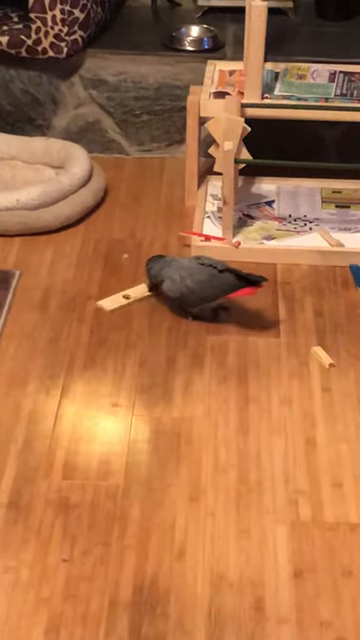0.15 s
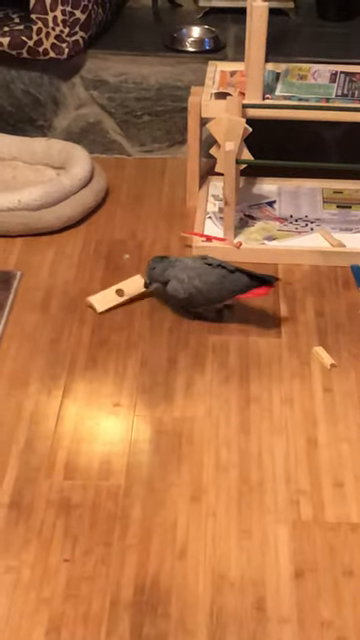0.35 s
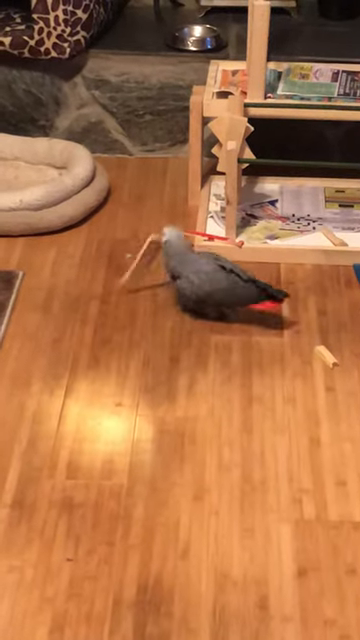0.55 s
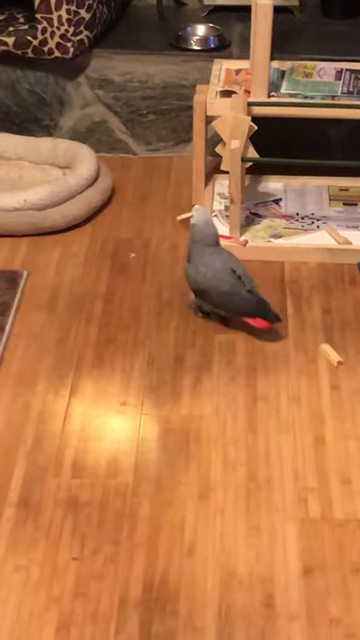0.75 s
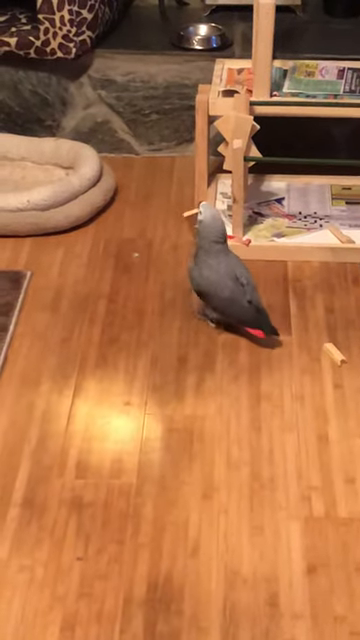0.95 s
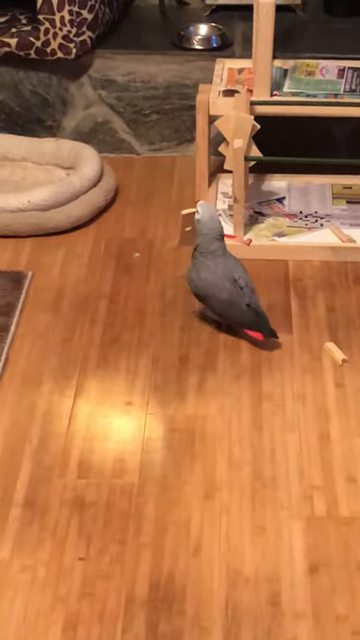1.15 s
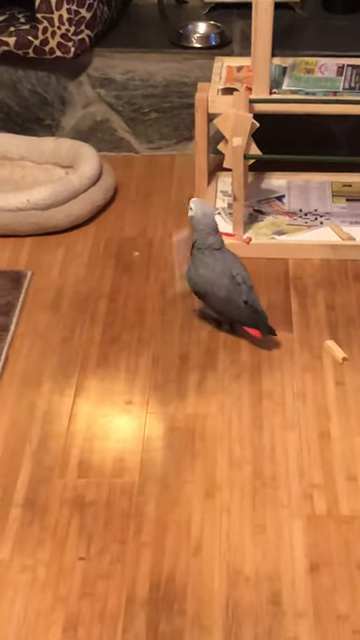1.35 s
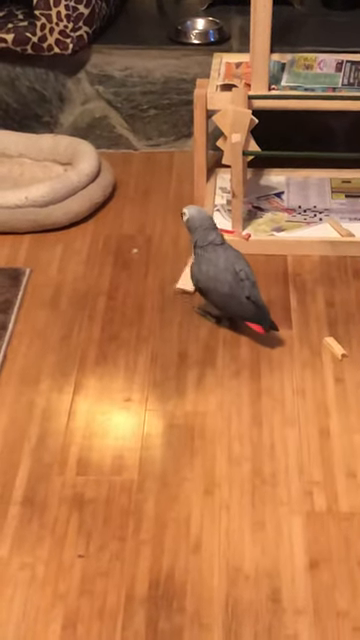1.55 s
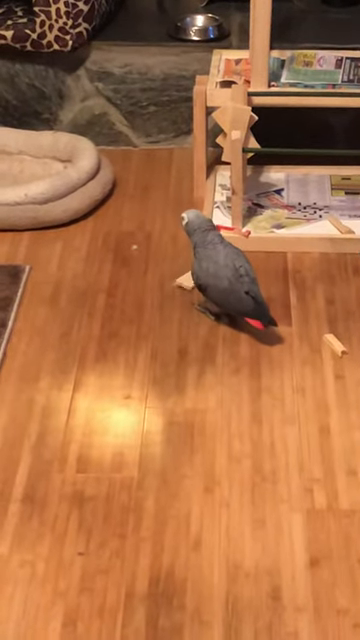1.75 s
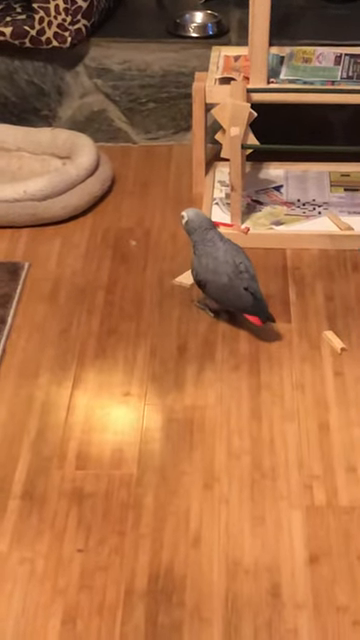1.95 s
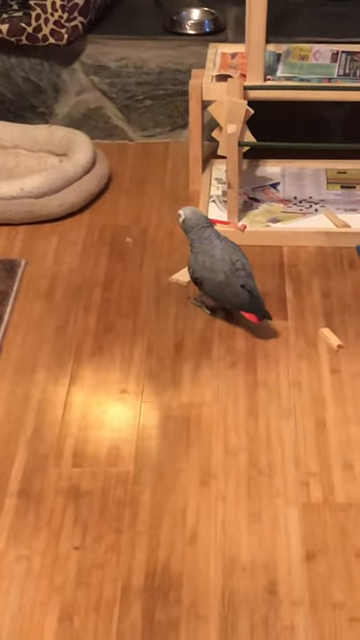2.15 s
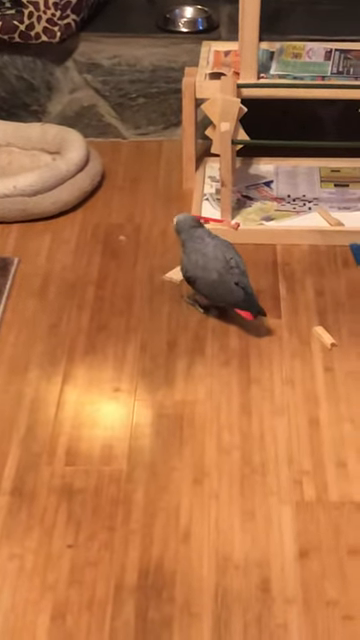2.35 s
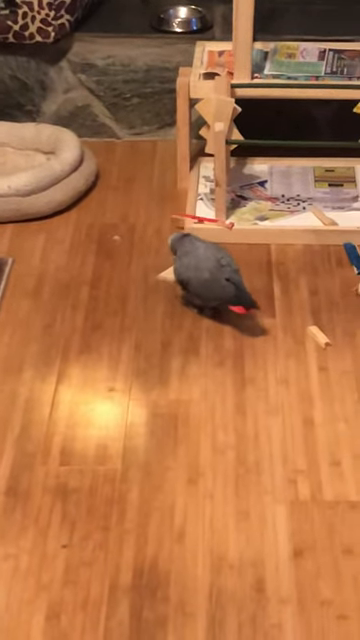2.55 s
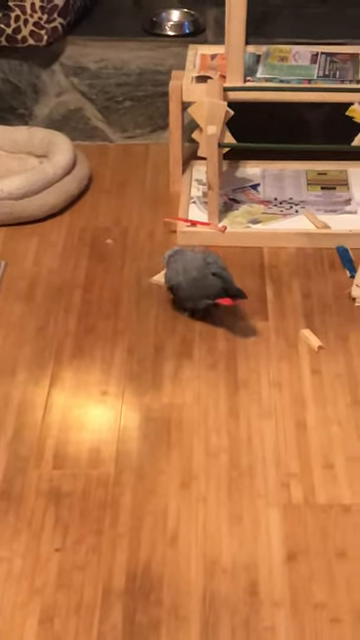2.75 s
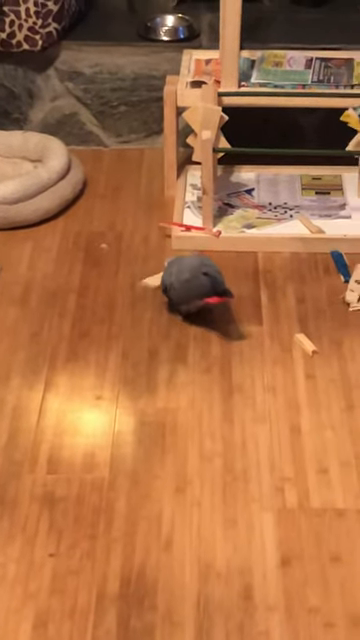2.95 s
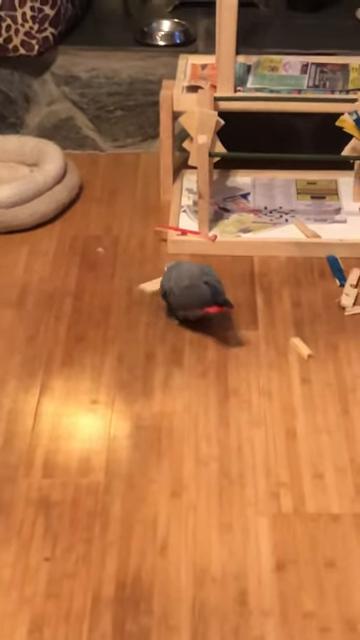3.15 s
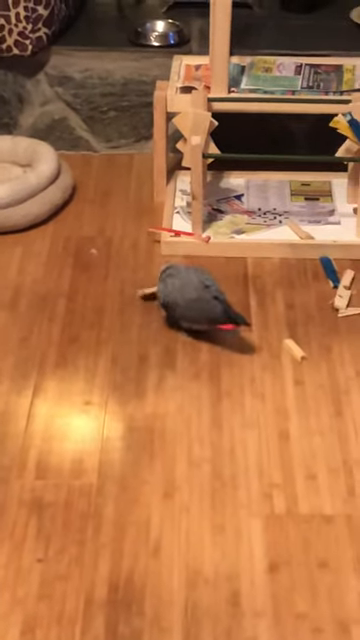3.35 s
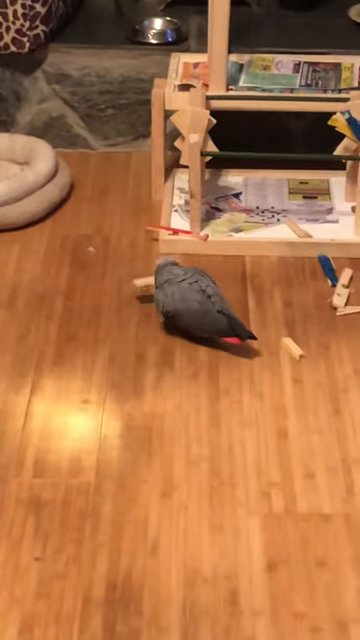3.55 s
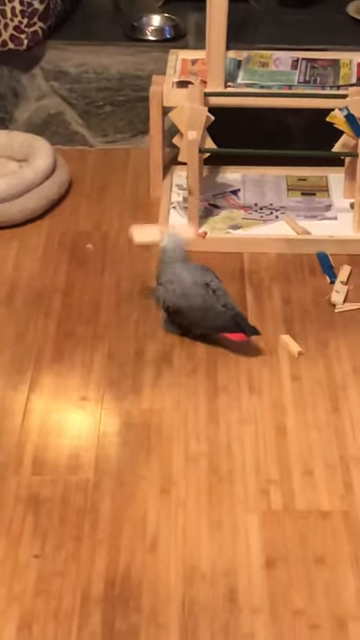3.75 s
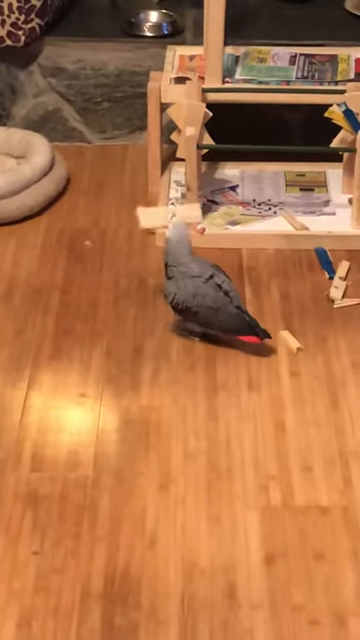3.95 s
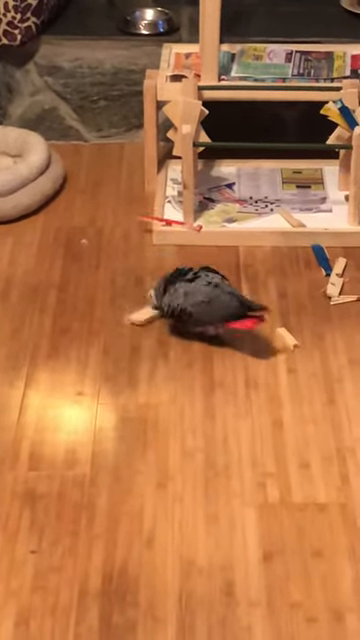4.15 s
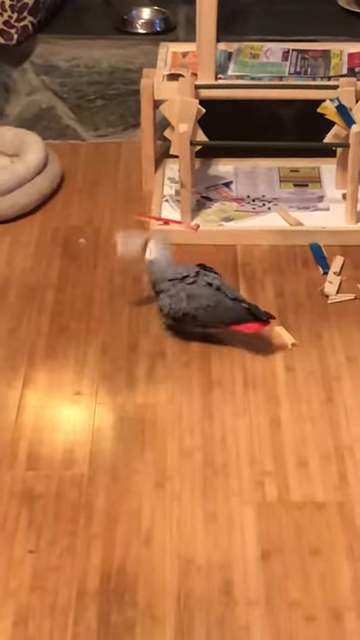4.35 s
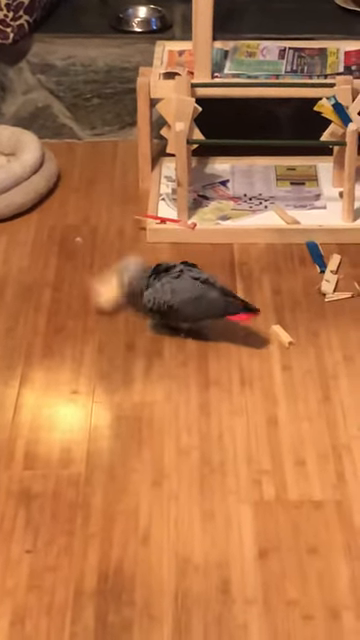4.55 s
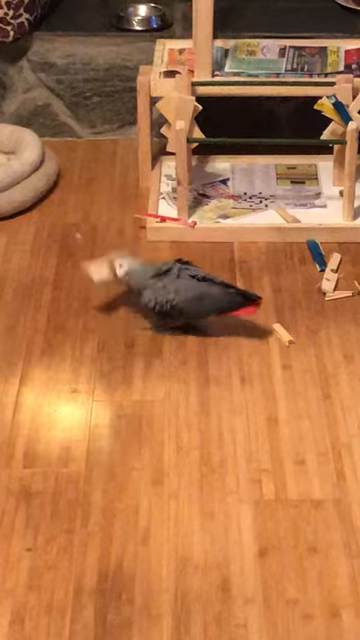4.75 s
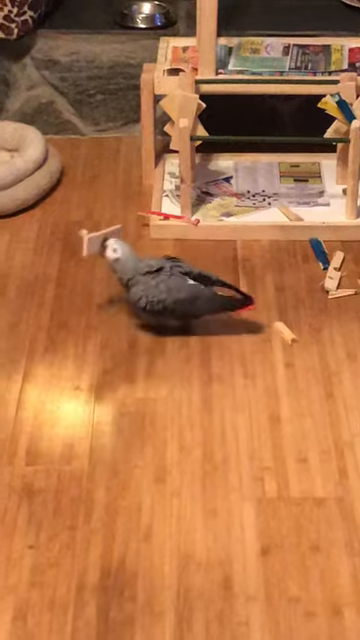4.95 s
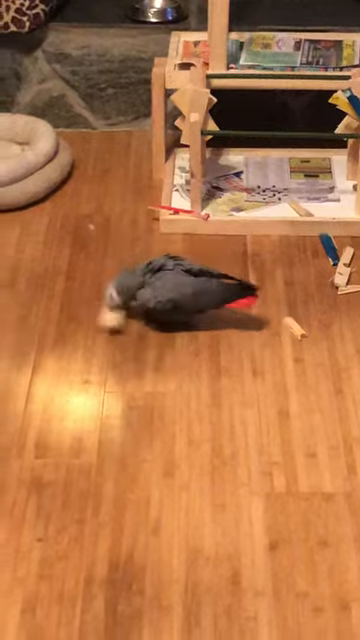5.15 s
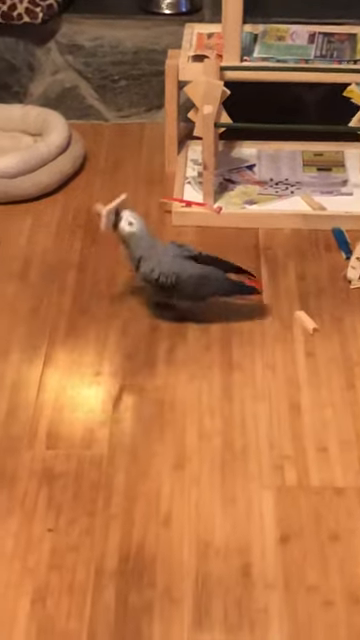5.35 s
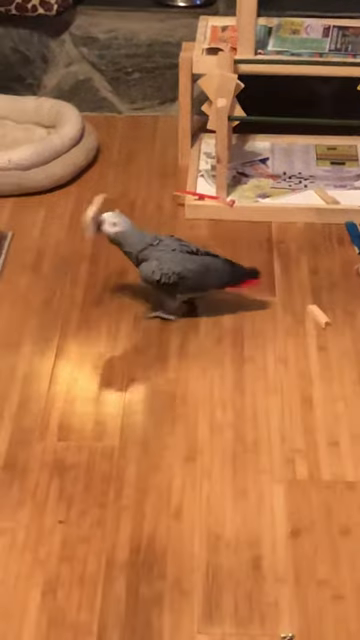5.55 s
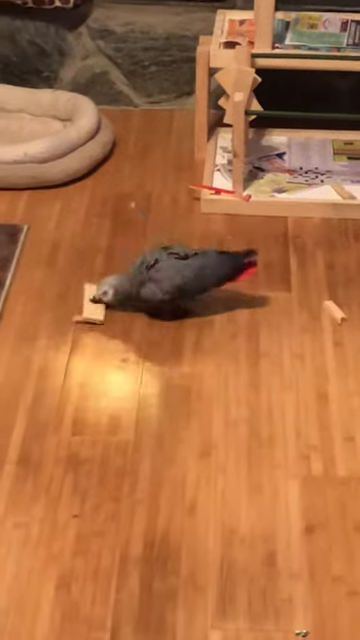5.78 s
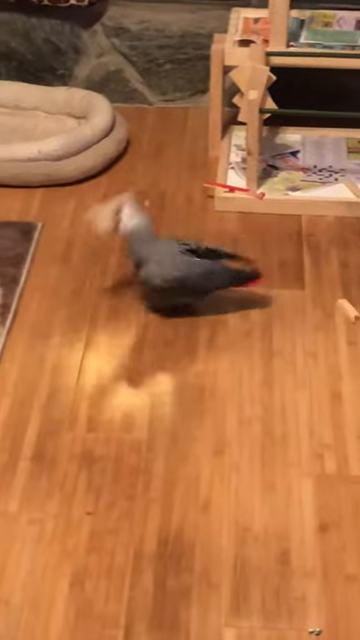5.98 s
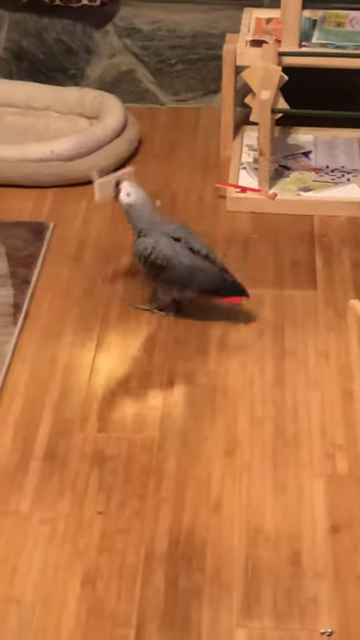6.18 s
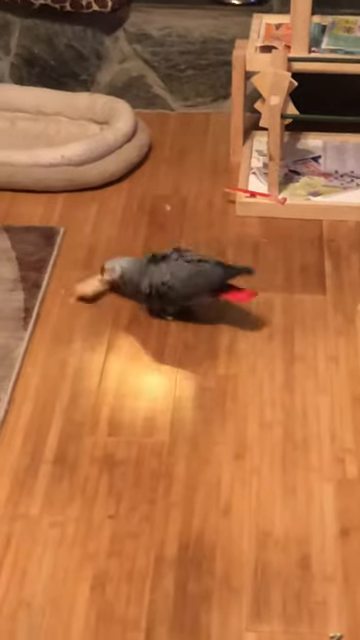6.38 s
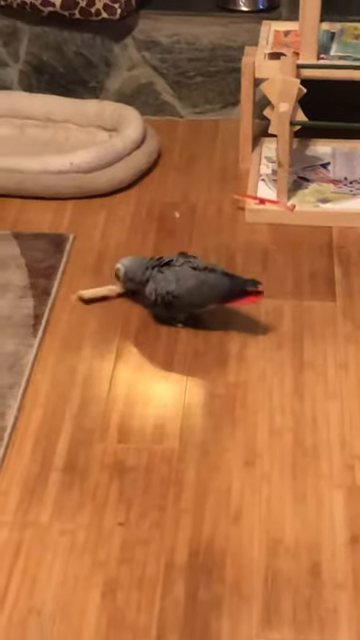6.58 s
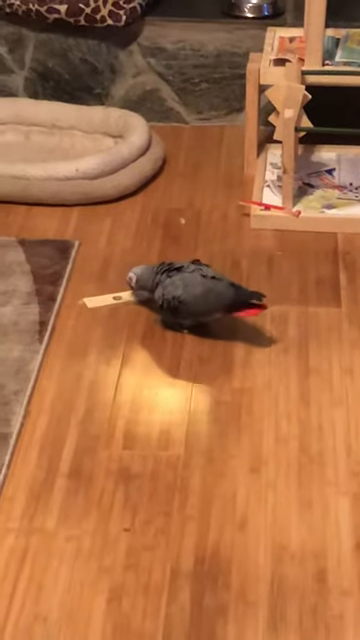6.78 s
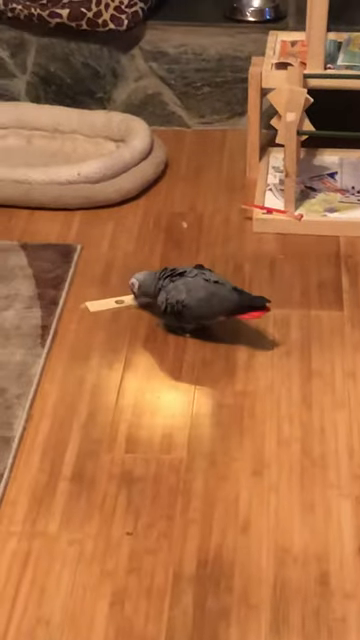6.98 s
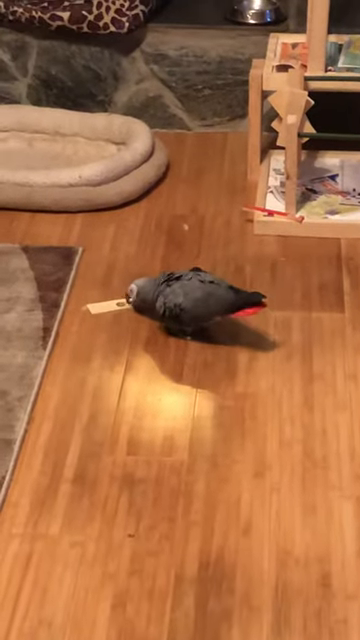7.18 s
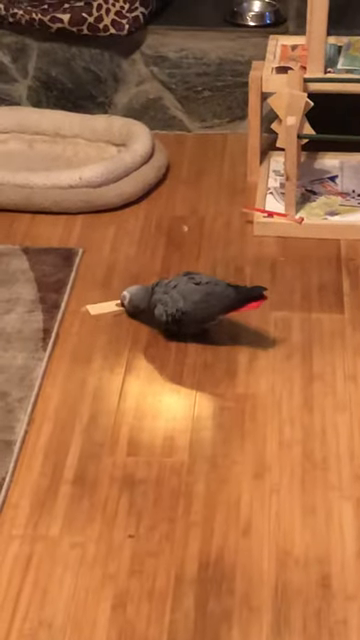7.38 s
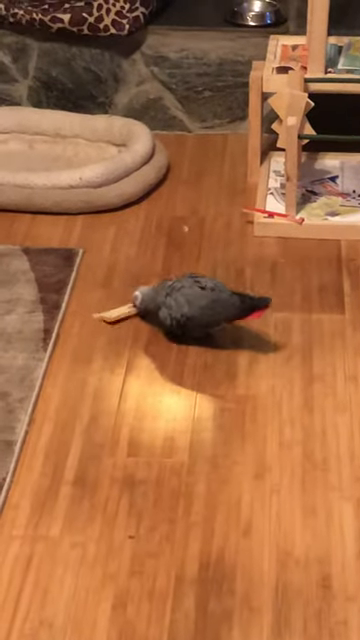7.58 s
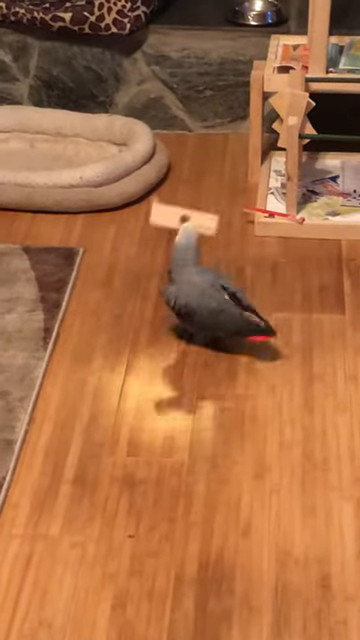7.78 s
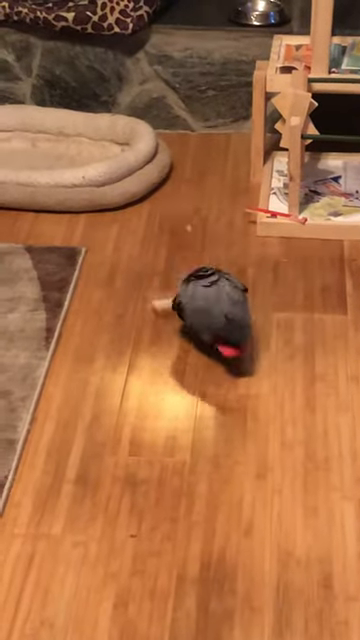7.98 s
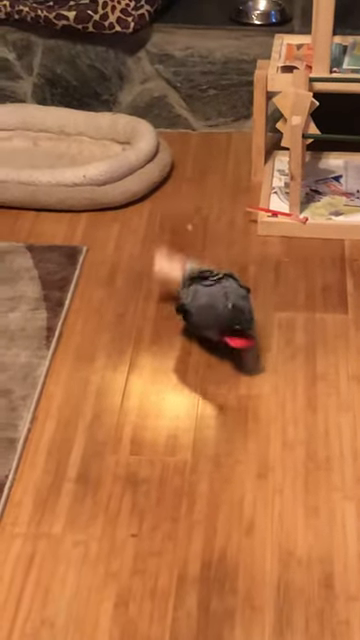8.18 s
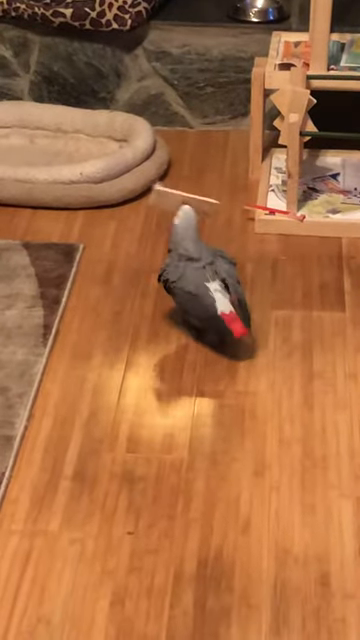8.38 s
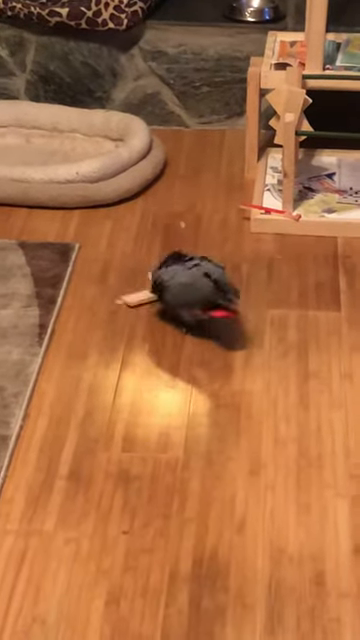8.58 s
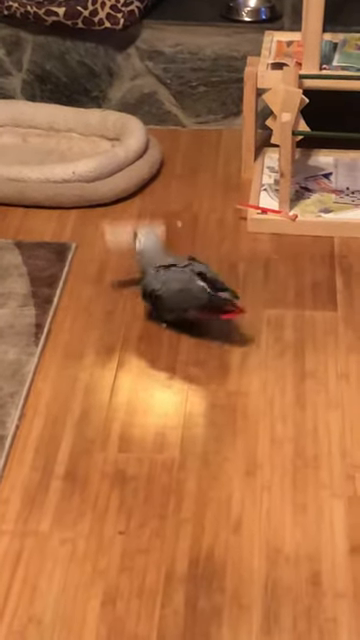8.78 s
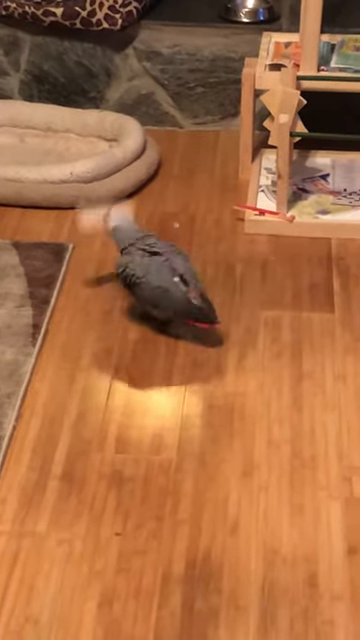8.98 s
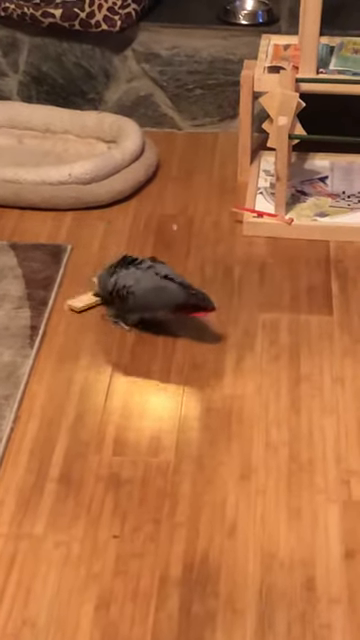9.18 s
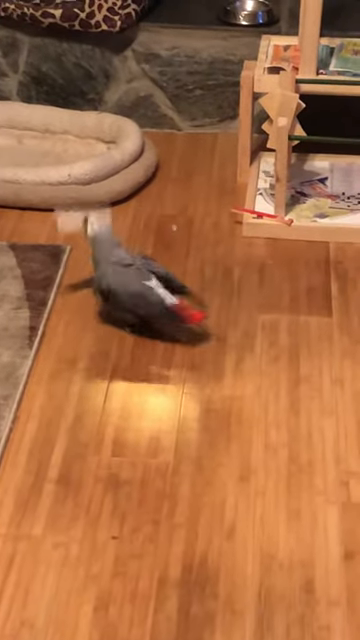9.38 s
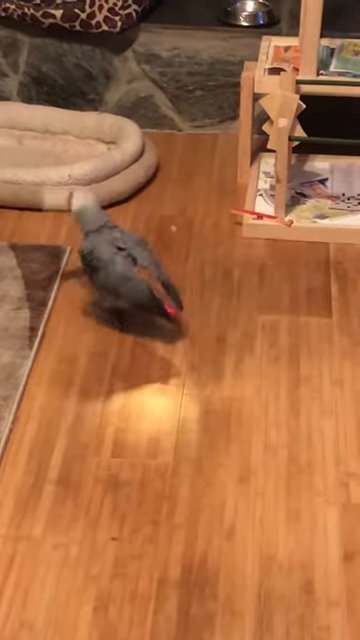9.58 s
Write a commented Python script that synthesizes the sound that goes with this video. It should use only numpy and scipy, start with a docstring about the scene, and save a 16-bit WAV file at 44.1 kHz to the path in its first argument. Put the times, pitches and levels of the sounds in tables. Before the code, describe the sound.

Irregular hard wooden knocks and quick clattering bounces on floorboards, with light claw clicks and brief rubbing, in a quiet lively living room.

```python
"""Parrot with a wooden block on a board floor

A parrot bangs a small wooden block on the floor of a living room, drops it, drags it and steps about.
Each contact sends a dispersive bending wave through the boards (a falling chirp); blows also crack and
ring the block's modes, and rubbing is a dense train of slips. Two near walls and a diffuse room answer.
A low motor hum, a wavering drone and room hiss lie underneath.
"""
import sys
import numpy as np
from scipy import signal
from scipy.fft import rfft, irfft, next_fast_len
from scipy.io import wavfile
from scipy.ndimage import uniform_filter1d, minimum_filter1d

SR = 44100
rng = np.random.default_rng(int(sys.argv[2]) if len(sys.argv) > 2 else 0)


def master(y):
    """Save y as 16-bit WAV."""
    cut = np.clip(np.atleast_2d(y).T, -1, 1)
    pcm = np.round(cut * 32767)  # scale
    wavfile.write(sys.argv[1], SR, pcm.astype(np.int16))


N = 424683
PULSE = 2048   # samples in one board wave
SIZE = next_fast_len(N + SR)   # transform length, with room for delays
HZ = np.maximum(np.arange(SIZE // 2 + 1) * SR / SIZE, 1.)


def from_db(db):
    """Logarithmic level: the amplitude gain of a level in dB."""
    return 10 ** (np.asarray(db) / 20)


def rms_one(x):
    """Normalisation: scales a signal to an rms of 1."""
    return x / np.sqrt(np.mean(x ** 2) + 1e-20)


def at_hz(points, hz, count=1):
    """Interpolation: reads a column of a spectrum table along a log-frequency axis."""
    points = np.array(points)
    return np.interp(np.log(hz), np.log(points[:, 0]), points[:, count])


def through(x, response):
    """Linear filtering: multiplies the spectrum by a frequency response."""
    return irfft(rfft(x, SIZE) * response, SIZE)[:N]


def filtered(x, order, kind, hz):
    """Linear filtering: a Butterworth filter of the given order and kind."""
    return signal.sosfilt(signal.butter(order, hz, kind, fs=SR, output="sos"), x)


def ring(x, modes):
    """Modal resonance: a unit click sets each mode ringing as a decaying sine at its level."""
    out = 0
    for hz, mode_db, t60_s in modes:
        radius = from_db(-60 / (t60_s * SR))
        angle = 2 * np.pi * hz / SR
        numerator = [0, from_db(mode_db) * np.sin(angle)]
        denominator = [1, -2 * radius * np.cos(angle), radius * radius]
        out = out + signal.lfilter(numerator, denominator, x + 1e-18)
    return out


BENDING_LAG_S = .0028   # how far 875 Hz trails 3.5 kHz


def board_wave(centre_hz, octaves):
    """Dispersion: bending waves travel with the root of frequency, so the bass trails.

    The peak is 1; 3.5 kHz arrives half-way in.
    """
    hz = np.arange(PULSE // 2 + 1) * SR / PULSE + 1.
    bending_cycles = BENDING_LAG_S * (2 * np.sqrt(3500 * hz) - hz)
    phase = 2 * np.pi * (bending_cycles + hz * PULSE / 2 / SR)
    off = np.log2(hz / centre_hz) / octaves
    shape_db = -6 * np.where(off > 0, off ** 4, off ** 2)   # a soft contact cuts the top steeply
    skirt_db = -13 - 13 * np.abs(np.log2(hz / centre_hz))   # weaker, broad spread of the blow
    skirt_db -= 12 * np.log2(np.maximum(400 / hz, 1))   # the boards radiate little deep bass
    wave = irfft((from_db(shape_db) + from_db(skirt_db)) * np.exp(-1j * phase), PULSE)
    return wave / np.abs(wave).max()


# Ways of landing, relative to the ring level of the blow:
# mode_family_1_db, mode_family_2_db, mode_family_3_db, mode_family_4_db, crack_db
FLAT = (-1, -11, -6, -5, 6.5)
CORNER = (-2.5, -12, -13, -9.5, -4.5)
BLUNT = (-12, -17.5, -13, -15, 14.5)   # the beak damps the block
EDGE = (-5.5, -1.5, -23, -9, 4.5)
TIP = (-16.5, -23, -11, -7, 11.5)
# The block hits the floor; thud and snap are peaks of the low and the high board wave:
# start_s, thud_db, thud_hz, snap_db, ring_db, landing
BLOWS = [(1.436, -7.5, 894, -18, -38.5, BLUNT), (1.532, -25, 750, -31.5, -57, CORNER),
         (1.663, -34, 950, -15, -15, FLAT), (1.667, -16, 1040, -5.5, -9.5, CORNER),
         (1.768, -29, 870, -40, -34, EDGE), (1.786, -30, 980, -23, -30, FLAT),
         (1.79, -20, 980, -13.5, -16.5, EDGE), (1.8, -44, 920, -16, -14, CORNER),
         (1.862, -30.5, 824, -24, -29.5, EDGE), (4.161, -11, 677, -10, -16.5, CORNER),
         (4.651, -26, 664, -11, -31, FLAT), (4.656, -10.5, 695, -1, -3.5, FLAT),
         (5.118, -15.5, 644, -12.5, -15.5, FLAT), (5.801, -22, 420, -16, -27.5, BLUNT),
         (6.45, -21.5, 630, -36, -37, EDGE), (6.461, -21, 750, -25, -26.5, EDGE),
         (6.474, -24.5, 715, -16, -25.5, EDGE), (6.49, -21.5, 760, -25, -33, EDGE),
         (6.596, -24.5, 760, -22, -31, TIP), (6.601, -32.5, 785, -12.5, -29, FLAT),
         (6.608, -34, 766, -25, -21, EDGE), (6.619, -28.5, 585, -34, -20.5, EDGE),
         (6.701, -25.5, 714, -21, -29.5, FLAT), (6.77, -37, 580, -39, -38, CORNER),
         (7.607, -68, 500, -61, -40.5, CORNER), (8.062, -21, 684, -24, -18, TIP),
         (8.066, -14, 704, -7.5, -14, CORNER), (8.603, -28, 670, -39, -24, TIP),
         (8.607, -12, 616, -10, -8, FLAT), (9.168, -21, 800, -16.5, -24, EDGE),
         (9.174, -15.5, 694, -38, -19.5, BLUNT)]
# Claws and beak touch the floor: start_s, thud_db, snap_db, tick_db
STEPS = [(0.749, -39, -39.5, -18.5), (0.974, -40, -35.5, -17), (1.374, -52, -51, -50),
         (2.364, -57.5, -47.5, -65), (2.63, -64, -71.5, -58), (2.71, -60, -65.5, -59.5),
         (2.845, -54.5, -62.5, -64), (3.386, -48.5, -37.5, -20.5), (3.443, -41.5, -62, -49.5),
         (3.777, -40.5, -44, -25.5), (3.914, -63.5, -45.5, -33), (3.988, -52.5, -42.5, -22),
         (4.129, -52, -45, -24.5), (4.575, -58, -47, -28.5), (4.611, -51, -43.5, -22),
         (5.055, -54, -42, -24.5), (5.533, -42, -36, -17.5), (5.669, -42, -35, -29),
         (5.68, -34.5, -49, -20), (5.893, -30, -30.5, -35), (5.936, -50, -50, -42),
         (6.122, -61, -46, -49.5), (6.222, -44.5, -39, -34.5), (6.38, -55, -54, -50.5),
         (7.163, -60, -57, -51), (7.412, -51, -49, -62), (7.451, -43.5, -46.5, -58), (7.505, -54, -59, -45),
         (7.745, -42, -34, -16.5), (7.936, -35, -30.5, -13), (8.484, -64, -43, -45),
         (8.579, -40.5, -45, -23), (9.086, -74, -50, -46.5), (9.107, -50, -43, -24.5),
         (9.149, -68, -54, -44), (9.519, -57, -42.5, -40), (9.573, -56.5, -43.5, -39)]
# Resonances of the floor: pitch_hz, level_db, t60_s
FLOOR_MODES = [(321, -47.5, 0.054), (452, -51, 0.089), (557.7, -52.5, 0.09), (668, -53.5, 0.034),
               (780.2, -50.5, 0.02)]
THUD_OCTAVES, SNAP_OCTAVES = 1.104, .4   # widths of the low and the high board wave
SNAP_HZ, SNAP_OCTAVES_PER_DB = 2500, .016   # a sharper contact (snap above thud) snaps higher
STEP_THUD_HZ, STEP_THUD_HZ_PER_DB = 577, 8.5
FIRM_STEP_DB = -42.5   # steps softer than this thud lower


def boards():
    """Impact excitation: each contact chirps in its own colour and leaves the floor modes ringing."""
    out = np.zeros(N + PULSE)
    contacts = [(s, thud_db, thud_hz, snap_db) for s, thud_db, thud_hz, snap_db, *_ in BLOWS]
    for s, thud_db, snap_db, _ in STEPS:
        thud_hz = STEP_THUD_HZ + STEP_THUD_HZ_PER_DB * min(thud_db - FIRM_STEP_DB, 0)
        contacts.append((s, thud_db, thud_hz, snap_db))
    for s, thud_db, thud_hz, snap_db in contacts:
        at = round(s * SR) - PULSE // 2
        snap_hz = SNAP_HZ * 2 ** (SNAP_OCTAVES_PER_DB * (snap_db - thud_db))
        out[at:at + PULSE] += from_db(thud_db) * board_wave(thud_hz, THUD_OCTAVES)
        out[at:at + PULSE] += from_db(snap_db) * board_wave(snap_hz, SNAP_OCTAVES)
    return out[:N] + ring(out[:N], FLOOR_MODES)


def landings():
    """Modal excitation: blow times, with the drive of each mode family and of the crack by landing."""
    rows = [(s, *(ring_db + np.array(way))) for s, *_, ring_db, way in BLOWS]
    s, *levels_db = np.transpose(rows)
    return s, levels_db


AIR_LAG_S = .001   # delay of the airborne sound


def burst(s, level_db, decay_s):
    """Broadband impact: one short dying puff of noise per contact, of set energy, just after its time."""
    out, t = np.zeros(N), np.arange(PULSE // 4) / SR
    puffs = rng.standard_normal((len(s), len(t))) * np.exp(-t / decay_s)
    starts = np.round((s + AIR_LAG_S) * SR).astype(int)
    for at, gain, puff in zip(starts, from_db(level_db), puffs):
        out[at:at + len(t)] += gain * puff / np.sqrt(np.sum(puff ** 2))
    return out


# Block resonances in four families, mixed differently by each way of landing: pitch_hz, level_db, t60_s
BLOCK_MODES = [
    [(3662, -4.5, 0.012), (4014, 0, 0.016), (4310, -1, 0.013)],
    [(5000, -0.5, 0.0082), (5182, -1, 0.01), (5620, -3.5, 0.014)],
    [(6400, 4.5, 0.0065), (6500, -10.5, 0.0032)],
    [(7830, 1, 0.0065), (8050, -3.5, 0.0058), (8860, -4, 0.0072)],
]
CONTACT_S = .00003   # decay time of the rough contact


def block():
    """Modal radiation: rough contacts ring each family of modes; a small body radiates no bass."""
    s, levels_db = landings()
    rings = 0
    for modes, blow_db in zip(BLOCK_MODES, levels_db):   # the last level, the crack, is left over
        rings = rings + ring(burst(s, blow_db, CONTACT_S), modes)
    return filtered(rings, 2, "high", 1200)


CRACK_S = .0003   # decay time of cracks and ticks
CRACK_HZ, TICK_HZ = 8200, (3360, 7800)   # lower edge of the crack, band of the tick
STEP_CRACK_DB, STEP_CRACK_FOLLOWS = -22, 0.49   # the crack of a step grows with its tick


def cracks():
    """Impulsive contact noise: every contact cracks in the treble; claws and beak also tick unringing."""
    s, levels_db = landings()
    step_s, *_, tick_db = np.transpose(STEPS)
    crack = burst(s, levels_db[-1], CRACK_S)
    crack += burst(step_s, STEP_CRACK_DB + STEP_CRACK_FOLLOWS * tick_db, CRACK_S)
    ticks = burst(step_s, tick_db, CRACK_S)
    return filtered(crack, 4, "high", CRACK_HZ) + filtered(ticks, 2, "band", TICK_HZ)


def grains(per_s, spread_db):
    """Stick-slip friction: random slips of uneven size and sign."""
    sizes = from_db(spread_db * np.minimum(rng.exponential(1, N), 4)) * rng.choice([-1, 1], N)
    return sizes * (rng.random(N) < per_s / SR)


# Rubbing and shuffling strokes, rms levels at the crest of the stroke (boards rumble, block dragged flat,
# block dragged on edge, rustle): start_s, length_s, rumble_db, flat_db, edge_db, rustle_db
RUBS = [(0.074, 0.27, -63.5, -71, -75, -74.5), (0.224, 0.24, -76.5, -74, -66.5, -85),
        (0.398, .2, -68, -74.5, -68, -73.5), (1.347, 0.062, -70, -87, -72, -65.5),
        (1.385, 0.033, -65, -90, -85, -86.5), (2.62, .15, -83, -99, -99, -82.5),
        (2.951, 0.16, -73, -83, -82.5, -79), (3.203, .18, -81.5, -79, -84, -76),
        (3.66, 0.083, -77.5, -83, -93.5, -77), (5.557, 0.16, -52, -75, -66, -70),
        (5.634, 0.12, -58, -70, -72, -60), (6.109, 0.094, -79, -61, -79, -60),
        (6.158, 0.14, -71.5, -66.5, -81, -56.5), (7.07, 0.15, -78, -90.5, -95, -78),
        (7.49, 0.051, -65.5, -75, -81, -72), (7.52, 0.095, -85, -65, -79, -62.5),
        (7.94, 0.11, -60.5, -75, -72, -61), (8.465, 0.084, -83, -64, -80.5, -65),
        (8.93, .13, -73, -70, -78, -66.5), (9.47, 0.12, -81, -80, -84, -64.5)]
# Resonances of floor and block while the block slides on edge, relative levels: pitch_hz, level_db, t60_s
EDGE_DRAG = [(770, 14, .02), (2360, 5, .02), (5120, 0, .035), (7830, -9, .03)]
# Relative spectrum of the boards under rubbing: frequency_hz, density_db (dB per Hz)
RUMBLE = [(150, -55), (300, -12.5), (550, -5), (900, -1.5), (1500, -9), (2500, -12.5), (4000, -49)]
# Relative spectrum of feathers and claws: frequency_hz, density_db (dB per Hz)
RUSTLE = [(900, -61), (2200, -10), (4000, 2), (7000, -2.5), (11000, -10), (16000, -14)]
STROKE_SKEW, STROKE_NARROW = .75, 1.5   # a stroke swells faster than it fades; sharpness of its hump


def rubs():
    """Friction excitation: dense slips drive boards and block; feathers and claws add a grainy rustle."""
    slips = grains(5000, spread_db=2.5)
    rumble = rms_one(through(slips, from_db(at_hz(RUMBLE, HZ))))
    flat = rms_one(ring(slips, BLOCK_MODES[0]))
    edge = rms_one(ring(slips, EDGE_DRAG))
    rustle = rms_one(through(grains(8000, spread_db=2.), from_db(at_hz(RUSTLE, HZ))))
    sounds, out = np.array([rumble, flat, edge, rustle]), np.zeros(N)
    for s, length_s, *levels_db in RUBS:
        at = round(s * SR)
        progress = np.linspace(0, 1, round(length_s * SR))
        hump = np.abs(np.sin(np.pi * progress ** STROKE_SKEW)) ** STROKE_NARROW
        stroke = from_db(levels_db) @ sounds[:, at:at + len(hump)]
        out[at:at + len(hump)] += hump[:len(stroke)] * stroke
    return out


# Reflections from two close surfaces: delay_s, level_db
ECHOES = [(.0046, -7), (.0116, -5)]


def near_walls(x):
    """Early reflection: airborne sound comes back delayed from two close surfaces."""
    response = sum(from_db(level_db) * np.exp(-2j * np.pi * HZ * delay_s) for delay_s, level_db in ECHOES)
    return through(x, response)


# Reverberation by band, levels relative to ROOM_DB: frequency_hz, t60_s, level_db
ROOM = [(143, 0.62, -1), (404, 0.57, 4.5), (1070, 0.58, 0.5), (2720, 0.51, -1), (4800, 0.5, 4),
        (9600, 0.3, 3.5), (16300, 0.46, 2)]
ROOM_DB, ROOM_RISE_S = -29.5, 0.00067   # tail gain, time constant of its build-up
SECTION_S = .4   # spacing of the time sections, each with its own noise tail


def room(x):
    """Diffuse reverberation: noise tails die band by band, crossfading from section to section."""
    hop, t = int(SECTION_S * SR), np.arange(SR // 2) / SR
    sections, tails = N // hop + 2, 0
    edges = 100 * 2 ** np.arange(0, 7.6, .5)   # half-octave bands, Hz
    white = rng.standard_normal((2, sections, len(t)))
    for k, (low, high) in enumerate(zip(edges, edges[1:])):
        band = filtered(white[k % 2], 2, "band", [low, high])   # neighbouring bands use separate noise
        hz = np.sqrt(low * high)
        decay_db = at_hz(ROOM, hz, count=2) - 60 * t / at_hz(ROOM, hz)
        tails = tails + band * from_db(decay_db)
    tails = tails * (1 - np.exp(-t / ROOM_RISE_S)) * from_db(ROOM_DB)
    padded, out = np.pad(x, (hop, 2 * hop)), np.zeros(N + 3 * hop + len(t))
    for k, tail in enumerate(tails):
        section = padded[k * hop:(k + 2) * hop] * np.hanning(2 * hop)
        wet = signal.fftconvolve(section, tail)
        out[k * hop:k * hop + len(wet)] += wet
    return out[hop:hop + N]


# Narrow noise resonances, width at half amplitude and rms level: pitch_hz, width_hz, level_db
DRONE = [(100, 13, -73), (121.67, 3.3, -65.5), (222, 25, -79)]
# Relative spectrum of the room hiss: frequency_hz, density_db (dB per Hz)
HISS = [(18, -29), (30, 5), (65, -6.5), (163, -8.5), (235, -8), (340, -17), (388, -17), (493, -21),
        (1800, -30), (8760, -38.5), (12000, -42.5), (14800, -41), (16500, -54.5)]
HISS_DB, HUM_HZ, HUM_DB = -59.5, 52.8, -60.5   # rms levels and hum pitch


def background():
    """Stationary noise: a steady motor hum and a wavering drone of narrow-band noise over room hiss."""
    out = from_db(HISS_DB) * rms_one(through(rng.standard_normal(N), from_db(at_hz(HISS, HZ))))
    out += from_db(HUM_DB) * np.sqrt(2) * np.sin(2 * np.pi * HUM_HZ * np.arange(N) / SR)
    for hz, width_hz, level_db in DRONE:
        resonance = 1 / (1 + (2 * (HZ - hz) / width_hz) ** 2)
        out += from_db(level_db) * rms_one(through(rng.standard_normal(N), resonance))
    return out


BOARDS_IN_ROOM_DB = -3   # the board waves reach the room more weakly than the microphone


def scene():
    """Superposition: contacts and rubbing, their reflections and reverberation, over the background."""
    floor = boards()
    airborne = block() + cracks()
    rubbing = rubs()
    reverberant = room(from_db(BOARDS_IN_ROOM_DB) * floor + airborne + rubbing)
    return (floor + airborne + rubbing + near_walls(airborne) + reverberant + background())[None]


TOP, LIMITER_S = .88, .004   # ceiling (full scale 1), limiter span
LOW_CUT_HZ, CUTOFF_HZ = 47, 16700


def record(dry):
    """Dynamic limiting and band limiting: look-ahead gain holds the peaks; deep bass and top are cut."""
    span = int(LIMITER_S * SR)
    needed = np.minimum(1, TOP / (np.abs(dry) + 1e-9))
    gain = uniform_filter1d(minimum_filter1d(needed, size=span), size=span)
    x = filtered(gain * dry, 8, "high", LOW_CUT_HZ)
    return signal.sosfilt(signal.cheby2(14, 70, CUTOFF_HZ, fs=SR, output="sos"), x)


dry = scene()
out = record(dry)
master(out)
```